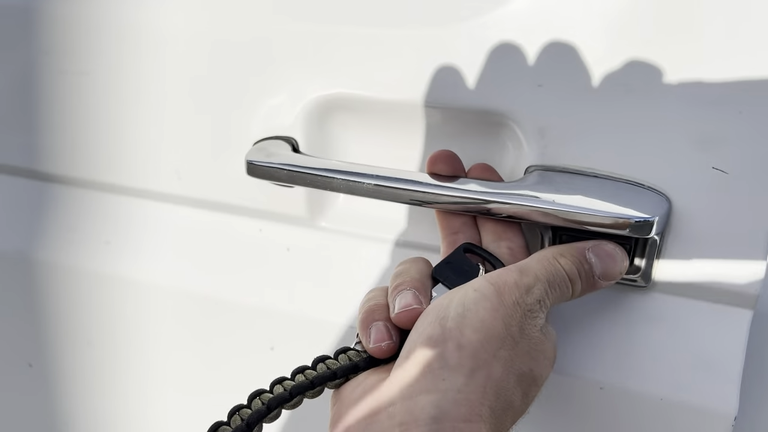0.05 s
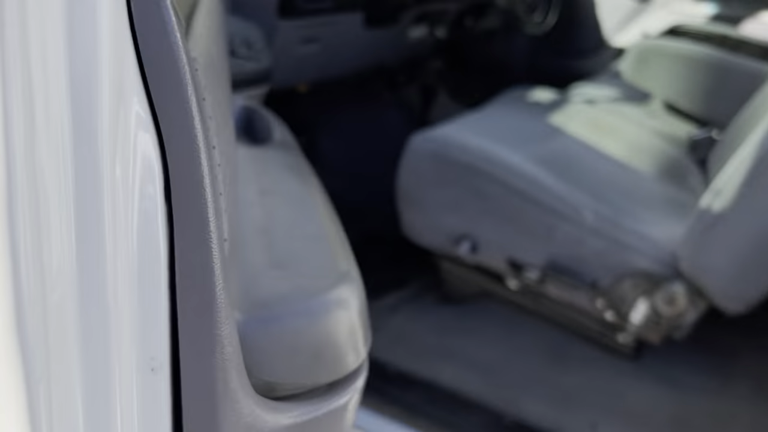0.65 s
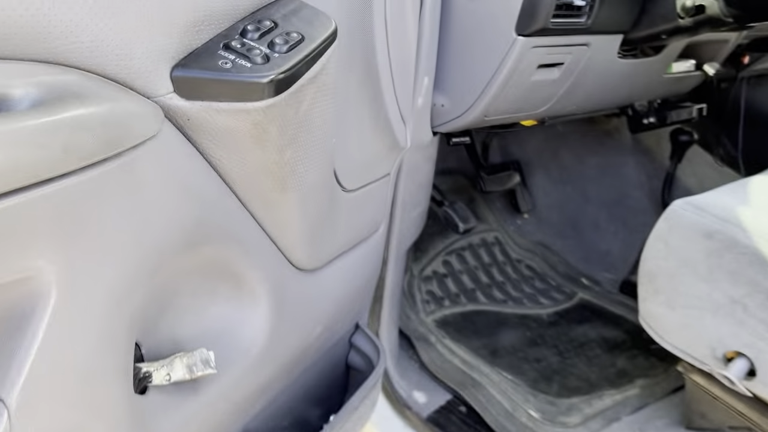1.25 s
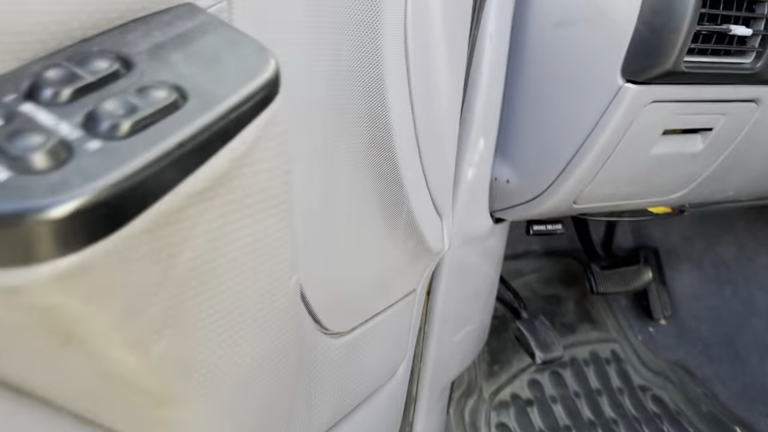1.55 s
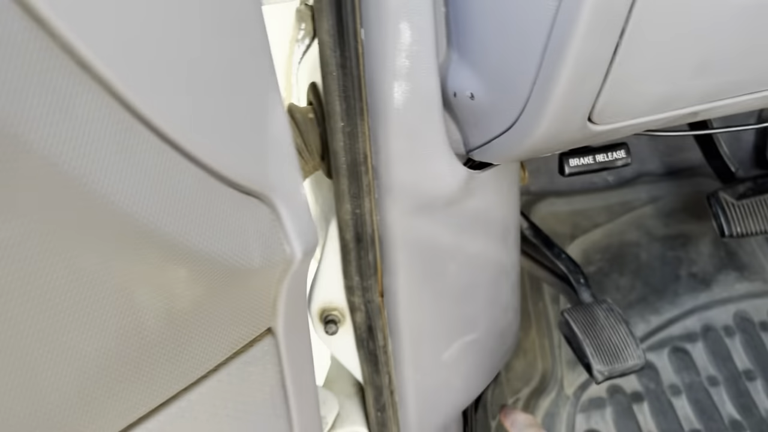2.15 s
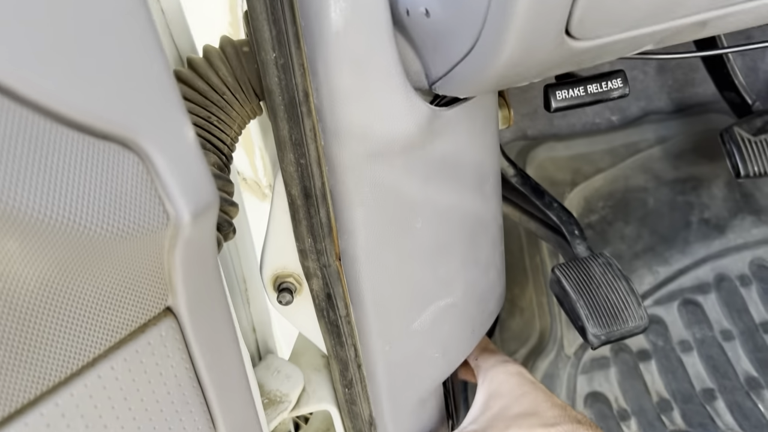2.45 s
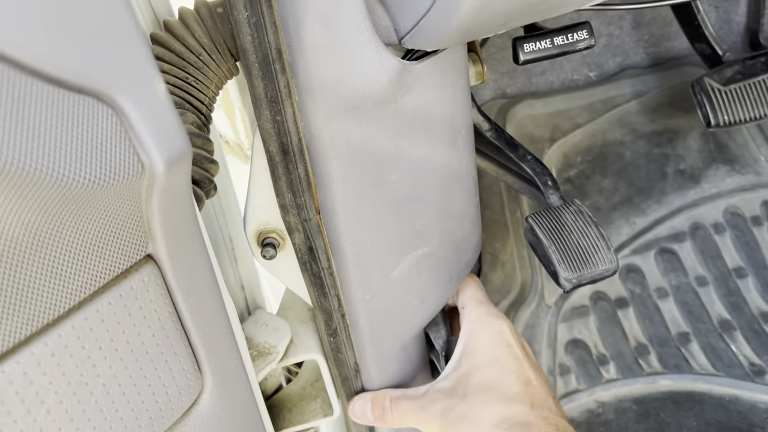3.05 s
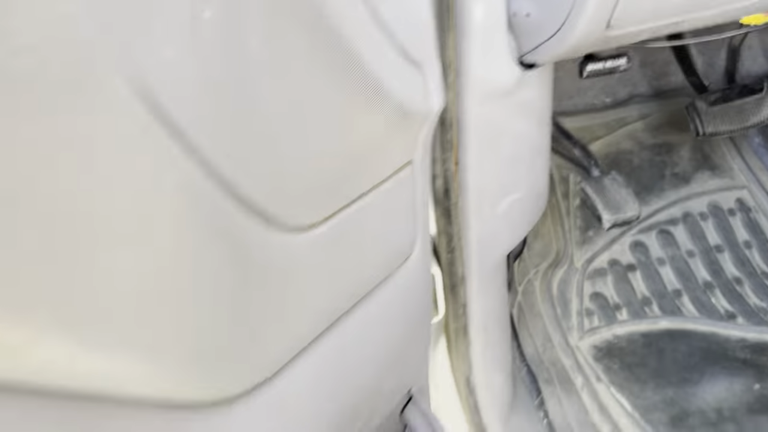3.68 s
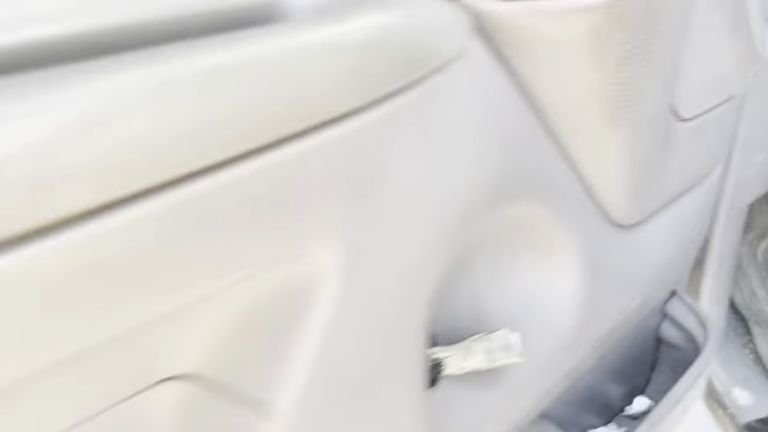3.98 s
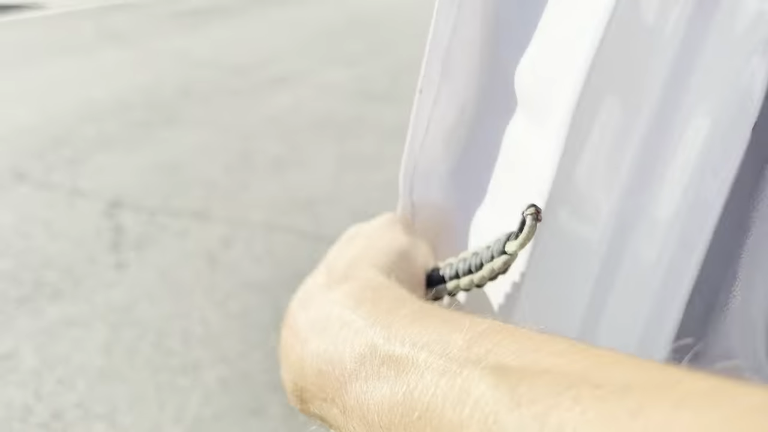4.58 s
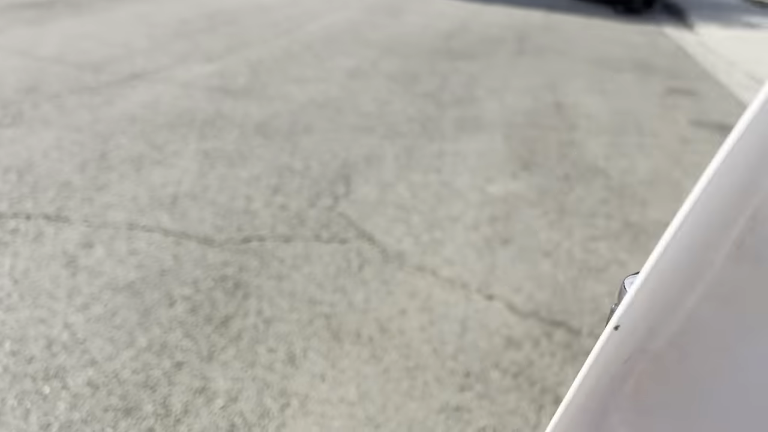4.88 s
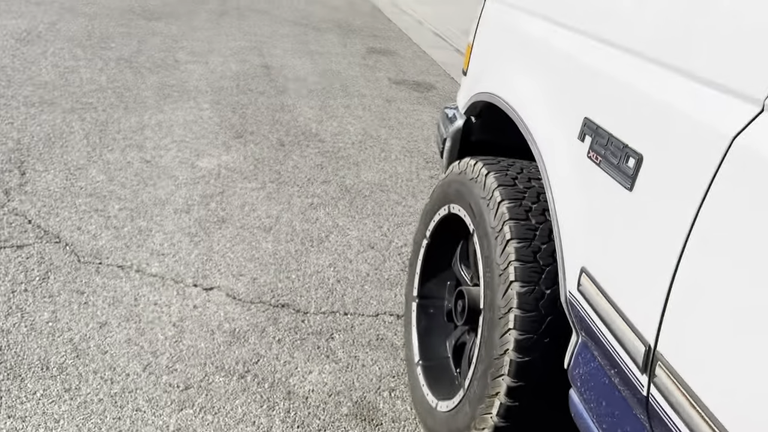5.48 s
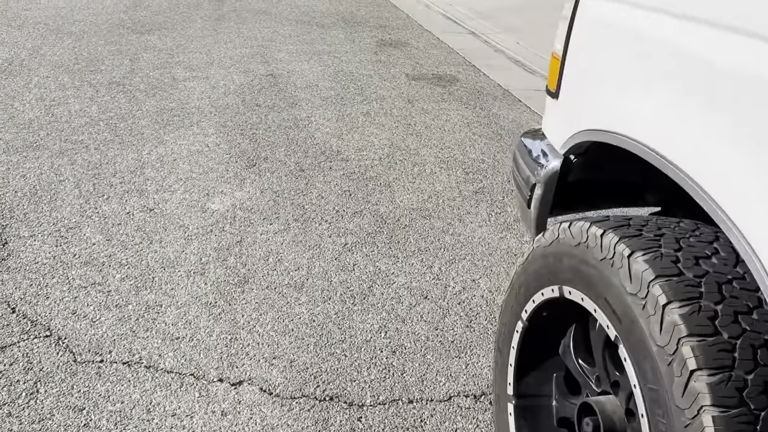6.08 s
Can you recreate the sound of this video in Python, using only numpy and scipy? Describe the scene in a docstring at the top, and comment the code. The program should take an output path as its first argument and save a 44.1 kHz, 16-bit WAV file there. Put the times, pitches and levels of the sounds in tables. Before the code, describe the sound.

Latch clicks, a brief hinge squeal, a hood release clunk and pop, and a booming door slam, amid wind rumble and rustling clothes.

```python
"""Popping a pickup's hood

Outdoors, close up on a hand-held phone. The door's handle button trips the latch and the dry hinge
squeals. Shoes scuff and clothes rustle as someone leans in and pulls the hood release; the hood latch
pops. The door swings back through its check strap and slams, booming in the cab. Wind buffets the
microphone whenever it moves, over a faint town hum."""
import sys
import numpy as np
from scipy import signal
from scipy.fft import rfft, irfft, next_fast_len
from scipy.io import wavfile
from scipy.ndimage import uniform_filter1d

SR = 44100
rng = np.random.default_rng(int(sys.argv[2]) if len(sys.argv) > 2 else 0)


def to_wav(s):
    """Save 16-bit WAV."""
    ch = np.atleast_2d(s).T  # columns
    pcm = np.round(np.clip(ch, -1, 1) * 32767)  # PCM
    wavfile.write(sys.argv[1], SR, pcm.astype(np.int16))


N = 279153
TIME = np.arange(N) / SR
TOP_HZ = 16000  # upper limit of the phone


def amp(db):
    """Decibels to gain."""
    return np.exp(np.asarray(db) * (np.log(10) / 20))


def unit(x, axis=None):
    """Scale to rms 1."""
    return x / np.sqrt(np.mean(x ** 2, axis=axis, keepdims=True) + 1e-30)


def colour_at(colour, hz):
    """Gain of a colour (frequency_hz, level_db), falling steeply beyond its ends."""
    f, db = np.transpose(colour)
    hz = np.maximum(hz, 1)
    gain = amp(np.interp(np.log(hz), np.log(f), db))
    return gain * np.minimum(hz / f[0], 1) ** 2 * np.minimum(f[-1] / hz, 1) ** 2


def pair(n, likeness):
    """White noise at the two microphone ports; likeness is the share of power they have in common."""
    shared = np.sqrt(likeness) * rng.standard_normal(n)
    return shared + np.sqrt(1 - likeness) * rng.standard_normal((2, n))


def tint(x, colour):
    """Give a sound a colour and rms 1."""
    size = next_fast_len(x.shape[-1])
    spectrum = rfft(x, size) * colour_at(colour, np.fft.rfftfreq(size, 1 / SR))
    return unit(irfft(spectrum, size)[..., :x.shape[-1]])


def walk(n, rate_hz):
    """A smooth random wander of spread near 1."""
    levels = rng.standard_normal(n // 4 + 2)
    return np.interp(np.arange(n) * rate_hz / SR, np.arange(len(levels)), levels)


def fade(t, t60):
    """Free decay after t = 0."""
    return amp(-60 * np.maximum(t, 0) / t60)


def add(out, x, start_s):
    """Mix x into out from start_s on."""
    i = int(round(start_s * SR))
    a, b = max(i, 0), min(i + x.shape[-1], N)
    out[:, a:b] += x[:, a - i:b - i]


def swells(movements, rise_db_per_s, fall_db_per_s):
    """Gain of movements that each rise, hold and die away; overlaps add in power."""
    start, end, db = np.transpose(movements)[:, :, None]
    t = TIME[::32]
    db = db - rise_db_per_s * np.maximum(start - t, 0) - fall_db_per_s * np.maximum(t - end, 0)
    return np.interp(TIME, t, np.sqrt(np.sum(amp(db) ** 2, axis=0)))


def blows(hits, colour, modes=(), *, damping, tail_db, tail_s, likeness,
          modes_db=0, chatter_db=2, lag_ms=0, pan_db=0, size=12288):
    """Parts scrape and strike: a dense ring whose treble dies first, any clear modes, a soft tail."""
    out, lead_s = np.zeros((2, N)), .04
    t = np.arange(size) / SR - lead_s
    f = np.fft.rfftfreq(size, 1 / SR)
    band_hz = 40 * 2 ** (np.arange(27)[:, None] / 3)
    masks = np.sqrt(np.maximum(1 - 3 * np.abs(np.log2((f + 1) / band_hz)), 0))
    port_delay = np.exp(np.outer([-2j * np.pi, 0], f) * lag_ms / 1000)
    ripple = amp(4 * walk(len(f), SR * f[1] / 70))  # many small resonances colour every blow alike
    life = (band_hz / 1000) ** -damping  # ring_s and tail_s are t60 times at 1 kHz
    attack = (t > 0) & (t < .02)
    for start_s, db, scrape_s, ring_s, tilt_db in hits:
        tilt = lambda hz: amp(tilt_db * np.log2(hz / 1500))
        bands = irfft((rfft(pair(size, likeness)) * port_delay * ripple)[:, None] * masks)
        scrape = np.exp(np.minimum(t, 0) / scrape_s)
        # low bands need about a cycle to build up
        build = 1 - np.exp(-np.maximum(t + 2 * scrape_s * np.sqrt(band_hz / 200), 0) * band_hz)
        decay = fade(t, ring_s * life) + amp(tail_db) * fade(t, tail_s * life)
        weights = colour_at(colour, band_hz) * np.sqrt(band_hz) * tilt(band_hz)
        ring = (unit(bands * scrape * build * decay, axis=-1) * weights).sum(axis=0 + 1)
        ring = unit(ring * amp(chatter_db * walk(size, 700)))
        if len(modes):
            mode_hz, mode_db, t60 = np.transpose(modes)[:, :, None]
            phase = 2 * np.pi * rng.random((len(modes), 1))
            phase = phase + (1 - likeness) * rng.standard_normal((2, len(modes), 1))
            tones = amp(mode_db) * tilt(mode_hz) * fade(t, t60) * np.sin(2 * np.pi * mode_hz * t + phase)
            ring = ring + amp(modes_db) * unit(tones.sum(axis=1) * scrape)
        add(out, ring * amp(db) / np.sqrt(np.mean(ring[:, attack] ** 2)), start_s - lead_s)
    return out * amp([[pan_db / 2], [-pan_db / 2]])


def town(level_db=-50, swell_db=-1.1):
    """Far traffic: a low hum shared by both ports under a diffuse wash."""
    # Traffic at a distance: frequency_hz, level_db
    colour = [(18, -42), (30, -7.5), (86, 4), (145, -3), (374, -8), (512, -11), (1190, -13.5),
              (2410, -27.5), (5900, -47.5), (8300, -47.5), (9460, -69.5), (11400, -41), (14400, -53),
              (16000, -48)]
    # Screening by the cab and the open door: time_s, gain_db
    shelter = [(0, 2), (1.6, -0.5), (2.2, -1.5), (2.9, -1.5), (3.7, 1.5), (4.4, 5), (4.9, 2.5), (5.6, 3.5),
               (6.33, 0)]
    hum = signal.sosfilt(signal.butter(2, 300, fs=SR, output="sos"), pair(N, 0.99))
    wash = signal.sosfilt(signal.butter(2, 300, "high", fs=SR, output="sos"), pair(N, 0.079))
    shelter_db = np.interp(TIME, *np.transpose(shelter))
    return tint(hum + wash, colour) * amp(level_db + shelter_db + swell_db * walk(N, 1.8))


def clothes(grain_db=3, flutter_db=1, still_db=-86.5, trim_db=6):
    """Close by, cloth slides over cloth in tiny catches with each movement; a sleeve swishes."""
    # Body movements and sleeve slides: start_s, end_s, level_db
    rustles = [(0.0, 0.1, -55.5), (0.42, 0.62, -58.5), (1.18, 1.4, -65.5), (1.47, 1.76, -60),
               (1.88, 2.28, -69.5), (2.85, 3.16, -63.5), (3.45, 3.68, -72.5), (4.14, 4.26, -56),
               (4.3, 4.6, -62.5), (4.75, 5.3, -70.5), (5.38, 5.6, -58.5), (5.7, 6.33, -67.5)]
    swishes = [(1.3, 1.48, -68), (2.84, 2.94, -70)]
    # The broad rustle and the narrow swish: frequency_hz, level_db
    cloth_colour = [(410, -31.5), (700, -6.5), (1600, -8.5), (2370, -18), (7690, -21), (9350, -27.5),
                    (11500, -19.5), (13700, -36.5), (14400, -48), (16000, -26.5)]
    swish_colour = [(3000, -16), (5000, 0), (6600, 2.5), (7600, -12), (10000, -25.5)]
    slopes = dict(rise_db_per_s=189, fall_db_per_s=63.5)
    fibres = pair(N, 0.043) * amp(grain_db * walk(N, 2500) + flutter_db * walk(N, 30))
    rustle = tint(fibres, cloth_colour) * np.hypot(swells(rustles, **slopes), amp(still_db))
    swish = tint(fibres, swish_colour) * swells(swishes, **slopes)
    return (rustle + swish) * amp(trim_db)


def wind(likeness=0.86, calm_db=-56.5, rumble_db=-4, buffet_db=1.5, small_eddies=44, eddy_cycles=1.97):
    """Turbulence rumbles at the ports with each gust; eddies thump, the higher ones more briefly."""
    # One gust for each sweep of the phone through the air: start_s, end_s, level_db, eddy_edge_hz
    gusts = [(0.0, 0.16, -41, 300), (0.2, 0.34, -33, 220), (0.595, 0.903, -34.5, 260),
             (1.043, 1.349, -37, 240), (1.5, 1.66, -44.5, 220), (2.766, 2.9, -46, 139.7),
             (2.972, 3.417, -36, 80), (3.454, 3.714, -27.5, 108), (3.866, 4.073, -26, 130),
             (4.116, 4.535, -28.5, 290), (5.015, 5.307, -33, 200), (5.399, 5.552, -22.5, 170),
             (5.634, 5.979, -28.5, 170), (6.32, 6.4, -36, 130)]
    # The hardest eddies to hit the ports: time_s, level_db, upper_edge_hz
    eddies = [(0.125, -28, 210), (0.192, -28, 436), (0.625, -34.5, 350), (1.266, -29.5, 213),
              (3.566, -23, 170), (3.637, -25, 112), (3.717, -21.5, 90.2), (3.811, -29, 141),
              (3.912, -23.5, 110), (4.031, -23.5, 298), (4.046, -12, 307), (4.062, -18.5, 333),
              (4.171, -21.5, 320), (4.453, -25.5, 286), (5.049, -20.5, 280), (5.134, -21.5, 244),
              (5.418, -15, 200.7), (5.547, -20, 145), (5.656, -21, 240), (5.86, -24.5, 197),
              (5.999, -26.5, 248)]
    # Wind on the microphone: frequency_hz, level_db
    colour = [(12, -47), (20, -26.5), (51, -1), (81, 0), (151, -8.5), (210, -11), (243, -17.5), (358, -24),
              (435, -41.5), (700, -50.5), (910, -70.5), (1540, -120)]
    start, end, gust_db, edges = np.transpose(gusts)
    gust = swells(np.column_stack([start, end, gust_db]), rise_db_per_s=299.5, fall_db_per_s=135)
    gust += amp(calm_db)
    rumble = signal.sosfilt(signal.butter(2, 194, fs=SR, output="sos"), tint(pair(N, likeness), colour))
    # the gust's strength alone sets the slow swell; the rumble lurches within it
    rumble /= np.sqrt(uniform_filter1d(np.mean(rumble ** 2, axis=0), size=3500))
    out = rumble * gust * amp(rumble_db + buffet_db * walk(N, 22))
    # lesser eddies come at random, at a level relative to the gust
    times = (np.arange(small_eddies) + rng.random(small_eddies)) * TIME[-1] / small_eddies
    force, smallness = rng.standard_normal((small_eddies, 2)).T
    gains = np.interp(times, TIME, gust) * amp(-1 + 2.5 * force)
    small_edges = np.interp(times, (start + end) / 2, edges) * 2 ** (.25 * smallness)
    hard = [(s, amp(db), hz) for s, db, hz in eddies]
    t = TIME[:SR // 5] - .1
    for time_s, gain, hz in list(zip(times, gains, small_edges)) + hard:
        swell = np.exp(-.5 * (t * hz / eddy_cycles) ** 2)
        eddy_colour = [(hz / 4, -3), (hz * 0.714, 0), (hz, -5), (hz * 2, -25), (hz * 4, -44)]
        eddy = tint(pair(len(t), likeness) * swell, eddy_colour)
        add(out, eddy * gain * np.sqrt(np.mean(swell ** 2)), time_s + t[0])
    return out


def shoes():
    """Soles scuff the asphalt below the phone."""
    # Scuffs: start_s, level_db, scrape_s, ring_s, tilt_db_per_octave
    hits = [(1.124, -36, 0.0019, 0.3, -3.5), (1.165, -40, 0.0069, 0.13, 2.5), (1.356, -36, 0.021, 0.12, -5),
            (1.412, -40.5, 0.0008, 0.024, -4), (1.484, -44, 0.01, 0.07, 3.5),
            (1.5216, -30.5, 0.00045, 0.047, -2), (1.585, -38.5, 0.0002, 0.032, 2.5),
            (1.695, -42, 0.012, 0.15, 1.5), (4.130, -30, 0.0029, 0.04, 1), (4.19, -43, 0.053, 0.23, 3)]
    # Sole on asphalt: frequency_hz, level_db
    colour = [(120, -14), (200, -8.5), (353, -3), (722, -6.5), (821, -5), (1060, -15), (1740, -19.5),
              (8420, -42), (9580, -38), (11100, -30), (16000, -52)]
    return blows(hits, colour, damping=0.19, tail_db=-19.5, tail_s=0.72,
                 chatter_db=1, likeness=0.23, pan_db=2, size=8192)


def grit(scrape_s=0.00051, ring_s=0.039):
    """Grit and small loose things tick."""
    # Ticks: start_s, level_db, tilt_db_per_octave
    ticks = [(1.0378, -63.5, 6), (1.666, -46.5, -2), (1.8666, -47, -0.5), (1.945, -52.5, -4),
             (2.159, -53, 10), (2.301, -51, -3.5), (2.547, -46, -4.5), (3.689, -60.5, 1.5),
             (4.306, -40.5, 16), (4.918, -56, -2.5), (5.314, -55.5, -0.5), (5.858, -54.5, 13),
             (5.898, -55.5, 11), (5.944, -57.5, 19), (6.214, -55, 26)]
    # Their thin ring: frequency_hz, level_db
    colour = [(500, -4.5), (1500, 1.5), (3000, -9.5), (6000, -4.5), (12000, -3.5), (16000, -21)]
    hits = [(start_s, db, scrape_s, ring_s, tilt_db) for start_s, db, tilt_db in ticks]
    return blows(hits, colour, damping=.15, tail_db=-13, tail_s=0.24,
                 chatter_db=-0.5, likeness=0.21, size=6144)


def door_handle():
    """The handle's button goes in and knocks the latch open."""
    # Knocks: start_s, level_db, scrape_s, ring_s, tilt_db_per_octave
    hits = [(0.026, -27, 0.0036, 0.049, -1.5), (0.037, -31.5, 0.0019, 0.04, -1),
            (0.052, -37.5, .0005, 0.089, -0.5), (0.101, -29, 0.0017, .07, 1),
            (0.142, -35.5, 0.0004, 0.032, -2)]
    # The handle's dense ring: frequency_hz, level_db
    colour = [(120, -38), (200, -1.5), (311, -10.5), (763, -4.5), (1320, -13), (1710, -4), (2090, -15.5),
              (3970, -23), (4680, -22.5), (7830, -27), (9400, -35), (11500, -25.5), (16000, -59.5)]
    # Its strongest modes: pitch_hz, level_db, t60_s
    modes = [(542, 3.5, 0.055), (785, -7, 0.097), (965, -3, 0.14), (1413, -6, 0.12), (1673, -19, 0.078),
             (5100, -17, 0.015), (11000, -26, 0.0079)]
    return blows(hits, colour, modes, modes_db=-5.5, damping=0.65, tail_db=-16.5, tail_s=0.27,
                 likeness=0.64, lag_ms=0.088)


def latch_pawl():
    """The steel pawl in the door latch clicks on opening, and faintly after the slam."""
    # Clicks: start_s, level_db, scrape_s, ring_s, tilt_db_per_octave
    hits = [(0.0515, -51, .0003, .025, -5), (0.068, -50, 0.00032, 0.09, -6),
            (0.0998, -28, 0.00015, .012, 0.5), (5.598, -56.5, .003, 0.11, -4)]
    # The pawl's bright ring: frequency_hz, level_db
    colour = [(2000, -10.5), (3800, -15), (5000, 2), (6500, -16.5), (9000, -12), (11500, 5), (13500, -11.5),
              (15000, -26.5)]
    # Its strongest modes: pitch_hz, level_db, t60_s
    modes = [(4600, 0.5, 0.013), (5000, -3, 0.015), (10950, -4, .016), (11400, -5, 0.019)]
    return blows(hits, colour, modes, modes_db=5.5, damping=0.089, tail_db=-24, tail_s=0.15,
                 likeness=0.58, lag_ms=0.023, size=6144)


def release_lever():
    """Inside the cab, the hood release lever scrapes and clunks as it is pulled."""
    # Clunks: start_s, level_db, scrape_s, ring_s, tilt_db_per_octave
    hits = [(2.856, -42, 0.022, 0.27, -0.5), (2.963, -21.5, 0.0068, 0.17, 3),
            (2.973, -20.5, 0.0026, 0.15, 0.5), (3.044, -35, .003, 0.99, -4.5)]
    # The lever's dense ring: frequency_hz, level_db
    colour = [(88, -38), (150, -6), (475, -6), (545, 0.5), (612, -1), (759, -10), (854, -23), (1020, -3),
              (1170, -9), (3350, -26), (4240, -30.5), (6770, -27.5), (16000, -42)]
    # Its strongest modes: pitch_hz, level_db, t60_s
    modes = [(417, -6, 0.18), (560, -2.5, .2), (759, -0.5, 0.14), (830, -4, 0.074), (1018, 2.5, 0.15),
             (1296, 0, 0.048), (1950, -10, 0.1), (2140, -26, .1), (2450, -32, 0.057), (2590, -19, 0.13),
             (3290, -15, 0.11)]
    return blows(hits, colour, modes, modes_db=-6.5, damping=0.34, tail_db=-15, tail_s=0.24,
                 chatter_db=-1.5, likeness=0.67, lag_ms=0.079, pan_db=2)


def hood_latch():
    """At the front of the truck, the hood latch pops in two quick blows."""
    # Blows: start_s, level_db, scrape_s, ring_s, tilt_db_per_octave
    hits = [(3.138, -25.5, 0.008, 0.25, -1.5), (3.167, -16, 0.00081, 0.11, 1)]
    # The hood's dense ring: frequency_hz, level_db
    colour = [(88, -38.5), (150, -11.5), (774, -5), (1190, -14.5), (1500, -7), (2500, -15.5), (2700, -20),
              (2920, -17), (4080, -31), (4490, -29), (7770, -26), (9080, -35), (11900, -21), (16000, -76)]
    # Its strongest modes: pitch_hz, level_db, t60_s
    modes = [(418, -12.5, 0.39), (510, -9, 0.33), (886, -15, 0.071), (900, -3, 0.052), (1230, -6, 0.12),
             (1334, 3, .08), (1474, 5.5, 0.037), (1544, 6.5, 0.055), (2030, -4, 0.082), (2425, -8, 0.051),
             (3370, -16, 0.092), (4090, -7.5, 0.059), (6610, -19, 0.056), (7900, -8.5, 0.054)]
    return blows(hits, colour, modes, modes_db=-4, damping=0.35, tail_db=-23, tail_s=0.095,
                 chatter_db=-1, likeness=0.26, lag_ms=0.047, pan_db=0.5)


def check_strap():
    """The door knocks through its check strap as it swings back."""
    # Knocks: start_s, level_db, scrape_s, ring_s, tilt_db_per_octave
    hits = [(4.4938, -16.5, 0.0011, 0.084, 1.5), (4.599, -46, 0.00081, 0.067, -1.8),
            (4.653, -40.5, 0.0096, 0.11, -4.5)]
    # The strap's dense ring: frequency_hz, level_db
    colour = [(180, -39), (300, -19), (412, -7.5), (528, -35.5), (725, 14), (1100, -28), (1280, -0.5),
              (1610, -7), (2000, -7.5), (4670, -11), (9240, -28.5), (12700, -12.5), (16000, -57)]
    # Its strongest modes: pitch_hz, level_db, t60_s
    modes = [(389.7, -7, 0.2), (686, 2, 0.11), (1230, -7, 0.1), (1970, -28, 0.2), (2606, -2, 0.033),
             (2990, -16, 0.11), (3550, -37, 0.15), (4400, -25.5, 0.11), (4830, -22, 0.089),
             (5170, -9, 0.015), (5932, -41, 0.16), (6500, -37, 0.045), (6780, -27, 0.057),
             (7900, -25, 0.053)]
    return blows(hits, colour, modes, modes_db=-4.5, damping=0.35, tail_db=-27, tail_s=0.26,
                 chatter_db=-4, likeness=0.46, lag_ms=0.15, pan_db=0.2)


def slipping(t, steps, end_s, sag_hz_per_s=300, glide_s=.01, break_s=0.0048,
             attack_db_per_s=1800.5, release_db_per_s=800, shell_hz=1365, shell_width_hz=10.6):
    """The hinge's slip rate, level and roughness: each step sags, then glides or breaks to the next."""
    start, rate, db, rough, glide = np.transpose(steps)
    step = np.maximum(np.searchsorted(start, t) - 1, 0)
    middle = (start + np.append(start[1:], end_s)) / 2
    since = t - start[:, None]
    drop = -np.diff(rate, prepend=rate[0]) * glide
    glide_hz = drop / 2 @ (np.sign(since) * np.exp(-np.abs(since) / glide_s))
    hz = rate[step] - sag_hz_per_s * (t - middle[step]) + glide_hz
    # around each change of rate the tone weakens and rasps
    breaking = np.exp(-np.abs(since) / break_s).sum(axis=0)
    rough = np.where(t < start[0], 1, rough[step] + 0.27 * breaking)
    ends_db = attack_db_per_s * np.maximum(start[0] - t, 0) + release_db_per_s * np.maximum(t - end_s, 0)
    # the door shell sings out as the slip rate passes its resonance
    shell_db = 7.5 / (1 + ((hz - shell_hz) / shell_width_hz) ** 2)
    return hz, db[step] - 4.5 * breaking + shell_db - ends_db, np.clip(rough, 0, 1)


def hinge(end_s=0.7543, jitter=0.068, waver=0.0073, flutter_db=6.5, rasp_db=-3, ring_db=-5, ring_s=0.11):
    """The dry hinge sticks and slips, slowing in steps; the door shell keeps each pitch ringing."""
    # Steps of the squeal: start_s, slip_rate_hz, level_db, roughness, glide_share
    steps = [(0.533, 1726, -26, .04, 0), (0.605, 1336, -25, .2, 0.7), (0.677, 973, -26, 0.05, 0.64),
             (0.731, 658.5, -37.5, 1.11, .03)]
    # The door shell's resonances: frequency_hz, level_db
    colour = [(620, 4), (790, 11.5), (1000, -17), (1280, 0), (1800, -3.5), (2250, -13.5), (2800, -15.5),
              (3500, -11), (4200, -22), (5200, -18.5), (6800, -23.5), (8500, -30.5), (12000, -35.5),
              (14000, -41.5)]
    during = TIME[(TIME > steps[0][0] - .02) & (TIME < end_s + .05)]
    hz, db, rough = slipping(during, steps, end_s)
    n = len(hz)
    unsteady_hz = hz * (1 + jitter * rough * walk(n, 900) + waver * walk(n, 118))
    phase = 2 * np.pi * np.cumsum(unsteady_hz) / SR
    harmonic = np.arange(1, 17)[:, None]
    flutter = amp([flutter_db * (1 - 1 / k) * walk(n, 71.3) for k in harmonic[:, 0]])
    # each partial swells and sinks as it slides across the shell's resonances
    partials = colour_at(colour, harmonic * hz) * (harmonic * hz < TOP_HZ) * flutter
    slips = np.sqrt(2) * (partials * np.sin(harmonic * phase)).sum(axis=0)
    rasp = amp(rasp_db) * rough ** 2 * tint(pair(n, 0.24), colour)
    squeal = amp(db) * (slips + rasp)
    t = TIME[:SR // 4]
    shell = unit(pair(len(t), 0.055) * fade(t, ring_s)) * amp(ring_db) / np.sqrt(len(t))
    shell[:, 0] += 1  # direct sound
    out = np.zeros((2, N))
    add(out, signal.fftconvolve(squeal, shell, axes=1), during[0])
    return out


def cab_boom(start_s=5.381):
    """The slam sets the cab's air and big panels throbbing in their low modes, alike at both ports."""
    # Low modes: pitch_hz, level_db, t60_s
    modes = [(60, -24, 0.3), (85, -22.5, 0.27), (114, -21, 0.16), (161, -9, 0.1), (208, -17, 0.13)]
    t = TIME[:SR]
    hz, db, t60 = np.transpose(modes)[:, :, None]
    tones = amp(db) * fade(t, t60) * np.sin(2 * np.pi * hz * t)
    out = np.zeros((2, N))
    add(out, tones.sum(axis=0, keepdims=True), start_s)
    return out


def door_slam():
    """Close to the phone, the door slams: one hard blow and three lesser ones set its panels ringing."""
    # Blows: start_s, level_db, scrape_s, ring_s, tilt_db_per_octave
    hits = [(5.3655, -13, 0.003, 0.21, 2.5), (5.382, -19, 0.00053, 0.2, 1), (5.439, -24, 0.0053, 0.06, -1),
            (5.554, -28, 0.0003, 0.11, -1)]
    # The door's dense ring: frequency_hz, level_db
    colour = [(21, -37), (35, -22), (98, -20), (129, -17), (163, -21), (205, -9.5), (399, -11),
              (798, -18.5), (907, -12.5), (1330, -24), (2280, -24.5), (7810, -34.5), (9340, -39),
              (11800, -25.5), (16000, -58)]
    # Its strongest modes: pitch_hz, level_db, t60_s
    modes = [(61, -5.5, 0.58), (110.4, -3, 0.64), (158.5, 4, 0.34), (414.5, 0.5, 0.22), (476, -2, 0.11),
             (569, -7.5, 0.17), (1160, -24, 0.78), (1408, -12, 0.32), (2270, -21.5, 0.16),
             (2460, -8.5, 0.072), (2500, -7, 0.14), (2820, -17, 0.19), (3010, -17.5, 0.28), (3470, -29, .2),
             (4090, -19, 0.19), (4670, -23.5, .22), (8000, -13.5, 0.11)]
    return blows(hits, colour, modes, modes_db=-5, damping=0.39, tail_db=-15.5, tail_s=0.7,
                 chatter_db=2.5, likeness=0.28, lag_ms=0.382, pan_db=-1.1, size=24576)


def scene():
    """The truck, the person and the open air, heard from beside the door."""
    latches = door_handle() + latch_pawl() + release_lever() + hood_latch()
    closing = check_strap() + door_slam() + cab_boom()
    return latches + closing + shoes() + grit() + hinge() + wind() + clothes() + town()


def record(dry):
    """The microphone port hollows the treble in two places; the phone cuts the top."""
    for notch_hz, q in [(9600, 3.4), (14600, 7)]:
        dry = signal.lfilter(*signal.iirnotch(notch_hz, q, fs=SR), dry)
    return signal.sosfilt(signal.ellip(8, .2, 70, TOP_HZ, fs=SR, output="sos"), dry)


dry = scene()
out = record(dry)
to_wav(out)
```